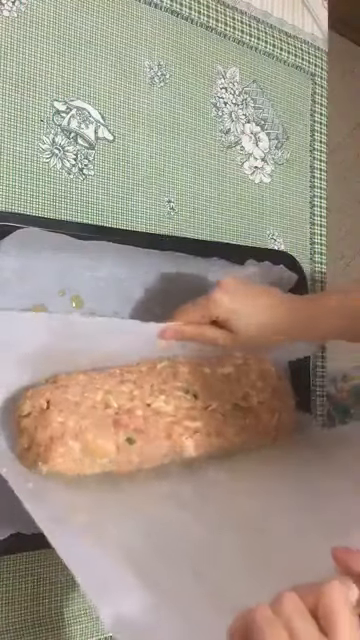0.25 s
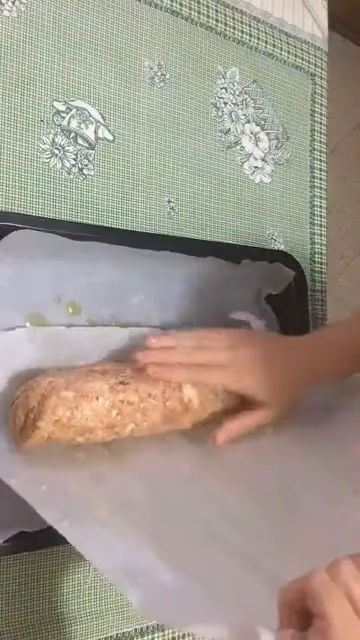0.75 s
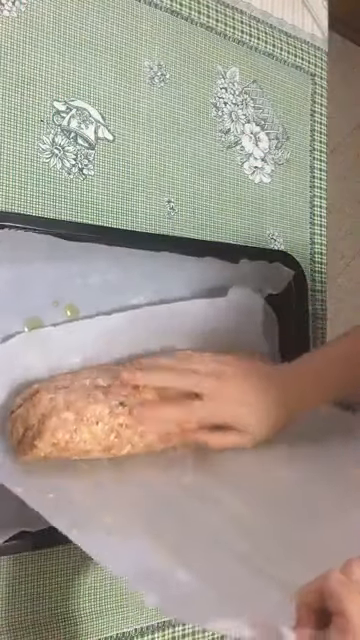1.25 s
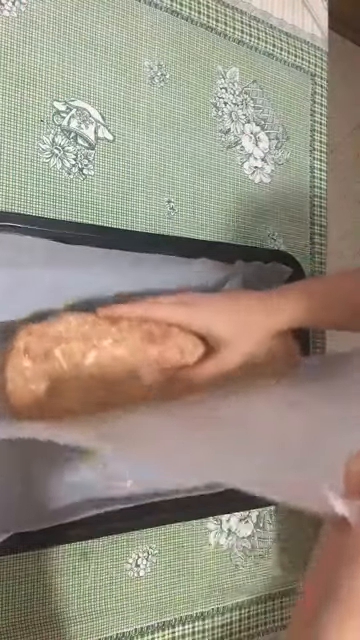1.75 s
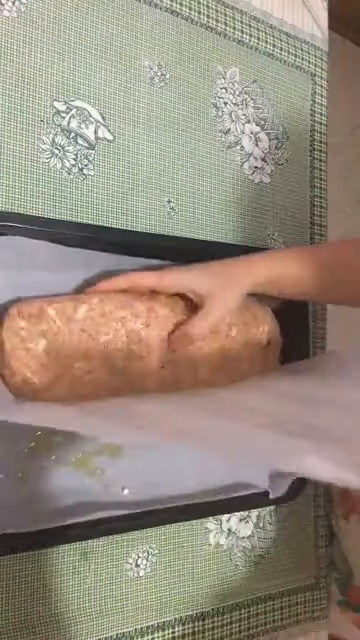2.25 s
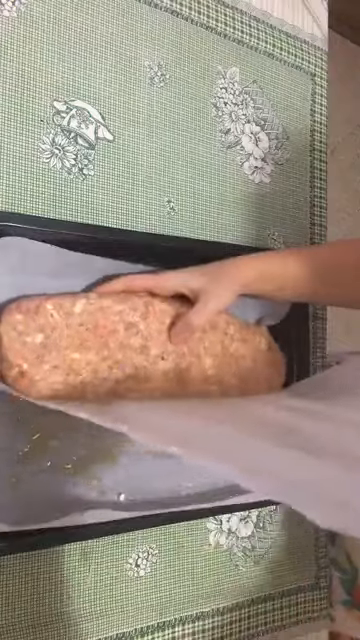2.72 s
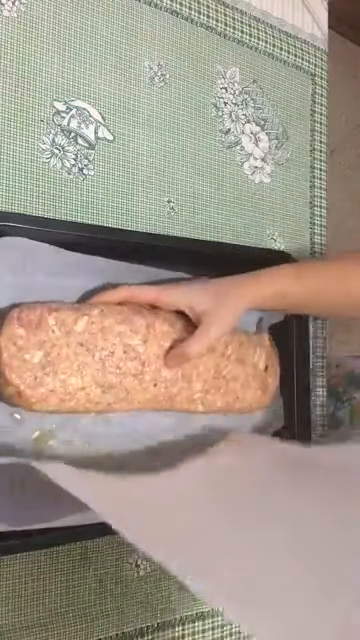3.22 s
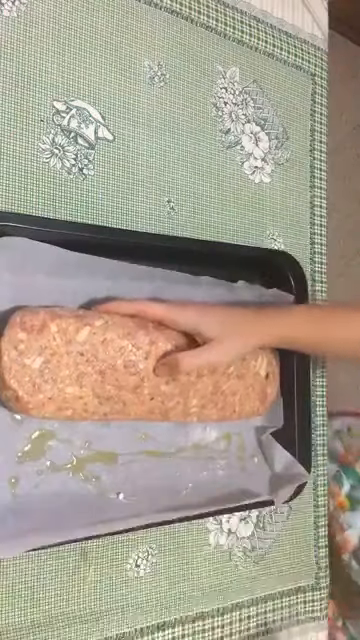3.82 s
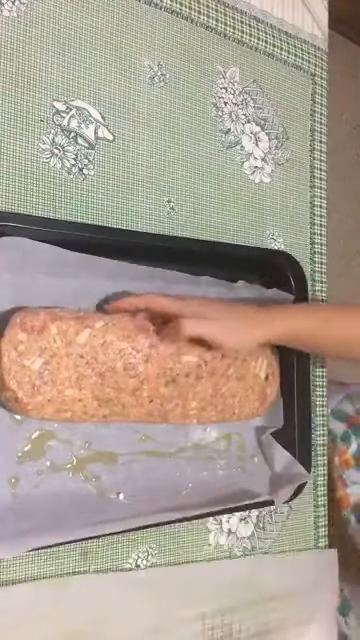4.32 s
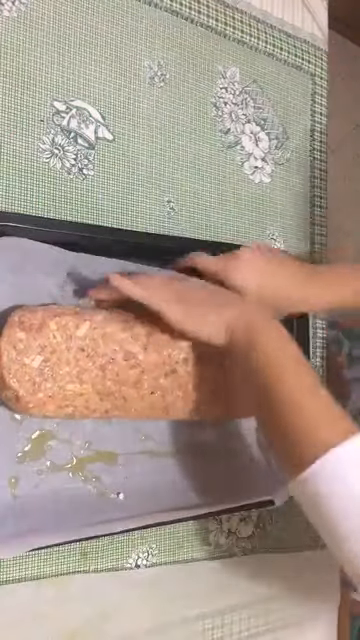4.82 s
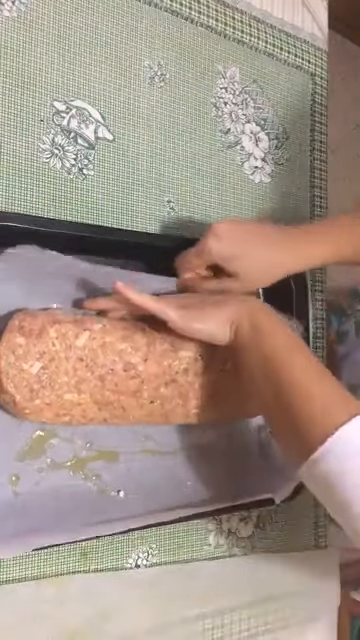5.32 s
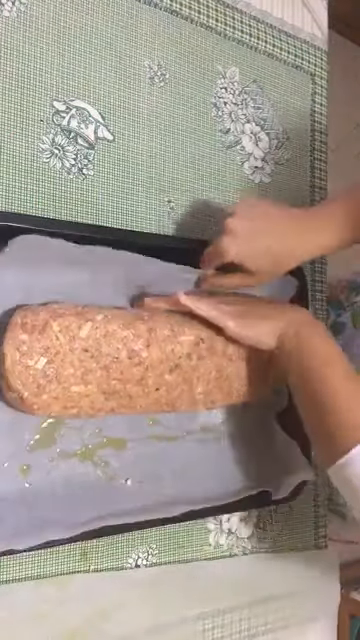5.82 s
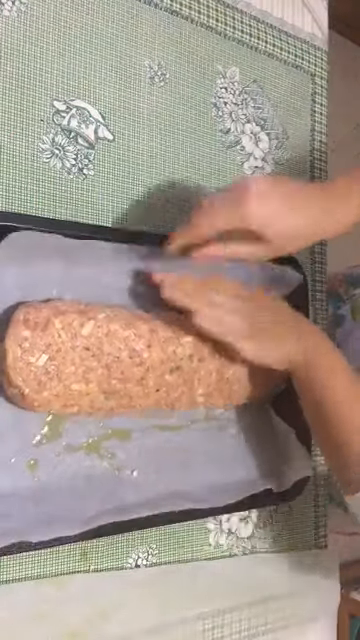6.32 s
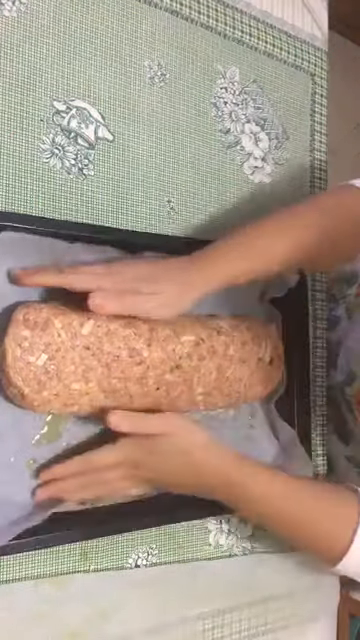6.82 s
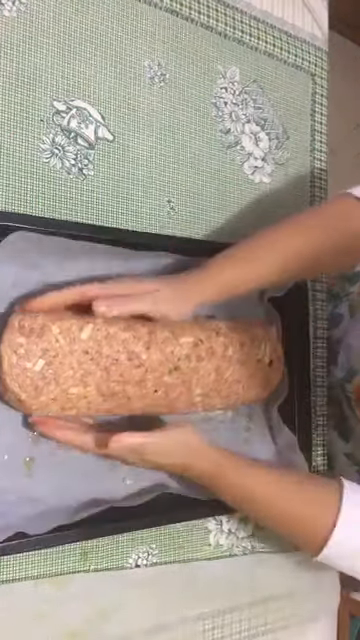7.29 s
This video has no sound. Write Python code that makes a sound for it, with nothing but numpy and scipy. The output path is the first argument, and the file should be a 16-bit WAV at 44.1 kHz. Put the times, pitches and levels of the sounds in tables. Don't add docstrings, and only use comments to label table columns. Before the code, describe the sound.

A sheet of baking parchment slides with a grainy rustle and scattered small snaps as a soft loaf is rolled off it into a metal tray. The sheet comes free with a brief swish, nearly quiet follows, then a hand thumps and the tray lining crackles loudly as it is tucked and patted. Small kitchen, close phone microphone, mono.

```python
import sys
import numpy as np
from scipy import signal
from scipy.fft import rfft, irfft, next_fast_len
from scipy.io import wavfile
from scipy.ndimage import uniform_filter1d

SR = 44100
rng = np.random.default_rng(int(sys.argv[2]) if len(sys.argv) > 2 else 0)


def field_ratio(decibels):
    return 10 ** (np.asarray(decibels, dtype=float) / 20)


def to_wav(s):
    ch = np.atleast_2d(s).T
    pcm = np.round(np.clip(ch, -1, 1) * 32767)
    wavfile.write(sys.argv[1], SR, pcm.astype(np.int16))


N = 332955


def rms_one(x):
    return x / np.sqrt(np.mean(x ** 2) + 1e-20)


def band(x, low_hz, high_hz):
    sos = signal.butter(2, [low_hz, min(high_hz, 0.45 * SR)], "band", fs=SR, output="sos")
    return signal.sosfilt(sos, x)


def drift(rate_hz):
    r = np.exp(-40 * np.pi * rate_hz / SR)
    slow = signal.lfilter([1], [1, -2 * r, r * r], rng.standard_normal(N // 20 + 4002))[4000:]
    return np.interp(np.arange(N) / 20, np.arange(len(slow)), rms_one(slow))


def ring(x, hz, t60_s):
    r, w = field_ratio(-60 / (t60_s * SR)), 2 * np.pi * hz / SR
    return signal.lfilter([0, np.sin(w)], [1, -2 * r * np.cos(w), r * r], x + 1e-18)


# pitch_hz, density_db (per Hz)
PAPER_COLOUR = [(15, -37), (25, -12), (49, -15), (166, -13), (310, -11), (346, -9), (519, -8.5),
                (663, -6.5), (823, -2.5), (1420, 0.5), (3100, 0.5), (8690, -10.5), (10500, -8.5),
                (12400, -17.5), (16200, -15)]


def paper_db(hz):
    colour_hz, colour_db = np.transpose(PAPER_COLOUR)
    return np.interp(np.log(hz), np.log(colour_hz), colour_db)


def zone_db(low_hz, high_hz):
    hz = np.linspace(low_hz, high_hz, 200)
    return 10 * np.log10(np.mean(field_ratio(2 * paper_db(hz))) * (high_hz - low_hz))


def grains(per_s, spread_db, clump):
    sizes = field_ratio(spread_db * np.minimum(rng.exponential(1, N), 5)) * rng.choice([-1, 1], N)
    return rms_one(sizes * (rng.random(N) < per_s * clump / SR))


# peak_s, rustle_db, swell_s, fade_s, brightness_db; swell and fade span 20 dB
PULLS_ON_SHEET = [(0.0, -45, .1, 0.13, -4), (.15, -56.5, 0.65, 1.3, -9), (0.319, -49.5, 0.13, 0.61, -1),
                  (0.431, -45, 0.35, 0.64, -2.5), (.63, -46.5, 0.033, 0.33, 5), (.8, -43.5, 1, 0.77, -5),
                  (0.991, -61, 0.31, .06, -2), (1.06, -55.5, 0.21, .4, -5.5), (1.15, -54, 0.4, 0.42, -9),
                  (1.274, -49.5, 0.15, 0.63, -4.5), (1.37, -48.5, 0.19, 0.62, -1.5),
                  (1.48, -47.5, .4, .5, 0.5), (1.62, -50.5, 0.44, 0.75, -0.5),
                  (1.821, -43.5, 0.14, 0.22, 4), (1.889, -40.5, 0.068, 0.19, 0),
                  (1.973, -42.5, 0.17, 0.59, 0.5), (2.471, -45.5, 1.08, 1.1, -1.5),
                  (2.95, -65, 0.29, 1.6, 13), (3.153, -49, 0.53, 0.5, 1.5), (3.2, -51, .1, 0.28, -1.5),
                  (3.35, -57, 0.39, .5, -0.5), (3.507, -47.5, 0.011, .25, 1), (3.55, -50, 0.11, 0.24, -1.5),
                  (3.65, -54, 0.12, 0.4, -2), (3.71, -50.5, 0.046, .2, 2), (3.747, -31, 0.033, 0.12, -1.5),
                  (3.82, -42, 0.063, 0.61, -3), (4.26, -50.5, 0.39, 0.13, 0), (4.33, -60.5, .2, 0.4, -9),
                  (4.45, -65.5, 0.48, .5, -1), (4.615, -68, .02, .2, 20), (4.638, -59.5, 0.05, 0.13, 23.5),
                  (4.69, -55.5, 0.068, 0.11, 12), (4.77, -68.5, 0.27, 0.23, 21)]
# peak_s, rustle_db, swell_s, fade_s, brightness_db
TUCKS_OF_LINING = [(4.834, -45, 0.013, 0.083, 5), (4.92, -52, 0.49, 0.84, 9), (5.005, -47, .03, .12, 8),
                   (5.082, -39.5, 0.11, .3, 2), (5.14, -42, .15, 0.27, 0), (5.205, -39.5, 0.095, 0.16, 5),
                   (5.254, -30, 0.11, 0.21, -1.5), (5.382, -36.5, 0.16, 0.13, -2),
                   (5.484, -40, 0.27, 0.46, -2), (5.742, -33, 0.18, 0.17, -1),
                   (5.88, -36.5, 0.13, 0.27, 3.5), (5.95, -33, 0.13, 0.055, -3.5),
                   (6.05, -39, 0.75, 0.82, -3.5), (6.163, -39, 0.4, 0.11, -0.5),
                   (6.225, -37.5, 0.054, 0.63, -3.5), (6.293, -38.5, 0.1, 0.26, -7.5),
                   (6.359, -48, 0.11, 0.35, -9), (6.578, -33.5, 0.0046, 0.2, 2),
                   (6.61, -32, 0.024, 0.22, -4), (6.707, -35, 0.032, 0.18, 1.5),
                   (6.85, -43.5, 0.63, 0.67, 0), (6.965, -40.5, 0.34, 0.2, 1), (7.058, -36, 0.013, 0.16, 3),
                   (7.1, -47.5, .1, 0.32, -0.5), (7.203, -45.5, 0.014, 0.38, -1),
                   (7.28, -43.5, 0.15, 0.14, 9), (7.371, -44.5, 0.16, 0.17, 0), (7.55, -50.5, 0.15, .1, -2)]
# loose_db, lining_db, brightness_share (ratio), pace (ratio), stillness_db
STROKE_ANSWERS = [
    (-4, -11, -0.82, 1.3, -71.5),
    (0, -1, 0.085, 1.63, -92),
    (-0.5, -2, 0.6, 1.8, -75.5),
]


def strokes():
    t = np.arange(0, N + 32, 32) / SR
    rows = np.concatenate([PULLS_ON_SHEET, TUCKS_OF_LINING])
    s, db, swell, fade, bright_db = rows.T[:, :, None]
    rising, falling = (s - t) / np.maximum(swell, 0.005), (t - s) / np.maximum(fade, 0.02)
    lost_db = 20 * np.maximum(rising, falling)
    previous, following = np.r_[s[:1], s[:-1]], np.r_[s[1:], s[-1:]]
    lost_db += 20 * np.maximum(0, np.maximum(previous - t, t - following)) / 0.082
    loose = np.arange(len(s))[:, None] < len(PULLS_ON_SHEET)
    levels = []
    for loose_db, lining_db, share, pace, still_db in STROKE_ANSWERS:
        stroke_db = db + np.where(loose, loose_db, lining_db) + share * bright_db - pace * lost_db
        power = field_ratio(2 * still_db) + field_ratio(2 * stroke_db).sum(axis=0)
        levels.append(np.interp(np.arange(N) / SR, t, 10 * np.log10(power)))
    return levels


# time_s, rumble_db
HAND_WEIGHT = [(0.0, -70.5), (1.4, -68.5), (1.9, -74), (3.45, -72.5), (3.85, -64.5), (4.8, -80),
               (4.83, -51), (5.178, -72.5), (5.55, -70), (5.9, -69.5), (6.59, -71.5), (6.884, -73),
               (7.3, -71), (7.55, -76)]
# low_hz, high_hz
HANDLING_ZONES = [
    (30, 120),
    (120, 400),
    (400, 1800),
    (1800, 6000),
    (6000, 15500),
]


def rustle():
    drum_db, rustle_db, hiss_db = strokes()
    weight_s, weight_db = np.transpose(HAND_WEIGHT)
    shake_db = np.interp(np.arange(N) / SR, weight_s, weight_db)
    levels = (shake_db, shake_db + 4, drum_db, rustle_db, hiss_db)
    efforts = np.array([level - zone_db(*limits) for level, limits in zip(levels, HANDLING_ZONES)])
    efforts[:2] += 0.52 * (drum_db - uniform_filter1d(drum_db, size=SR // 2))
    creasing = np.clip((rustle_db + 67.0) / 20, 0.5, 2)
    centres = np.log([np.sqrt(low * high) for low, high in HANDLING_ZONES])
    flutter = drift(25)
    slips = grains(1100, 4.5, field_ratio(5.0 * flutter))
    smooth = rng.standard_normal((2, N))
    edges, out = np.geomspace(32, 16600, 28), 0
    for k, (low, high) in enumerate(zip(edges, edges[1:])):
        hz = np.sqrt(low * high)
        place = np.interp(np.log(hz), centres, np.arange(5))
        place = np.floor(place) + np.clip(2 * (place % 1) - 0.5, 0, 1)
        effort_db = sum(max(1 - abs(place - z), 0) * efforts[z] for z in range(5))
        grit = np.clip(np.log(hz / 300) / 1.95, 0, 1)
        friction = smooth[k % 2] * field_ratio(1.33 * grit * flutter) + 0.81 * grit * creasing * slips
        patch = rms_one(band(friction, low, high))
        level_db = effort_db + paper_db(hz) + 0.4 + 1.56 * drift(12.2)
        out = out + field_ratio(level_db) * np.sqrt(high - low) * patch
    return out


# pitch_hz, level_db, t60_s
TRAY_MODES = [(355.8, -1.5, 0.41), (480, -9.5, 0.53), (634, -1.5, 0.29), (667.6, 1.5, 0.24),
              (748, -3, 0.27), (1115, -15, 0.12), (1250, -5.5, 0.46), (1340, 1, 0.19), (1390, -5, 0.3),
              (1550, -32, 0.3)]


def lined_tray(x):
    metal = sum(field_ratio(db) * ring(x, hz, t60) * (-1) ** k for k, (hz, db, t60) in enumerate(TRAY_MODES))
    return x + field_ratio(-57.0) * metal


def nearness_db(hz, favoured_hz):
    return -7 * np.log2(hz / favoured_hz) ** 2


# thump_db, tray_ring_db, favoured_pitch_hz
LOAF_PATS = [(-43, -39, 630), (-62, -54, 430), (-46.5, -49, 920), (-47.5, -52.5, 210), (-80, -46.5, 1900),
             (-63, -51.5, 340), (-60, -75, 400), (-62, -66, 360), (-59, -73, 400), (-53, -70, 400),
             (-62, -65, 360)]
PAT_MOMENTS = [4.826, 6.297, 6.61, 6.905, 4.259, .208, .005, .89, 5.65, 5.89, 7.21]
# pitch_hz, level_db, t60_s
TABLE_MODES = [(49, -0.5, 0.26), (63.6, -0.5, .15), (89, -10, 0.22), (140, -23, 0.11)]


def pats():
    thump_db, tray_db, favoured_hz = np.transpose(LOAF_PATS)
    at, push = (np.array(PAT_MOMENTS) * SR).astype(int), np.zeros(N)
    push[at] = field_ratio(thump_db)
    soft = np.hanning(500)
    table = sum(field_ratio(db) * ring(push, hz, t60) for hz, db, t60 in TABLE_MODES)
    out = np.convolve(table, soft / soft.sum() * 2)[:N]
    dying = signal.lfilter([1], [1, -field_ratio(-60 / (0.19 * SR))], push)
    out += field_ratio(-13) * dying * rms_one(band(rng.standard_normal(N), 70, 600))
    for hz, db, t60 in TRAY_MODES:
        tap = np.zeros(N)
        tap[at] = field_ratio(tray_db + db + nearness_db(hz, favoured_hz))
        out += ring(tap, hz, t60)
    return out


# time_s, peak_db, patch_pitch_hz, bright_part_db # creases, strong and slight, buckling as
SHEET_CREASES = [(.0911, -26.5, 3850, -1), (.1719, -33.5, 3280, -13), (.208, -25.5, 2820, 5),
                 (.2221, -34, 2860, -14), (.2463, -33, 1420, -10), (.2982, -35, 3000, -1),
                 (.4859, -21.5, 1400, 1), (.5028, -26, 9000, -22), (.61, -31, 8500, -7),
                 (.649, -20.5, 2560, -3), (.882, -24.5, 2750, 2), (.8903, -25, 1910, 1),
                 (.9716, -33, 1680, 2), (1.2761, -25.5, 1460, 11), (1.2823, -26.5, 2360, -9),
                 (1.3306, -27, 2520, 4), (1.5061, -28.5, 2390, -20), (1.5127, -27.5, 8960, -7),
                 (1.6392, -30.5, 8200, -21), (1.8245, -24.5, 5600, 4), (1.8675, -25.5, 3880, -4),
                 (1.8946, -16, 3470, 6), (1.979, -32, 3120, 11), (2.0141, -23.5, 6060, -11),
                 (2.091, -27.5, 4120, 4), (2.5491, -26, 1460, 4), (2.8319, -36.5, 1530, 0),
                 (2.8831, -35, 2082, -9.5),
                 (3.165, -22, 1940, 5), (3.1964, -28, 6430, 0), (3.212, -34, 2540, -11),
                 (3.2454, -22.5, 1910, 5), (3.3285, -30.5, 2040, -1), (3.341, -26, 3870, 3.5),
                 (3.377, -39, 1530, -33), (3.4281, -39, 3530, 1), (3.4405, -42, 4260, 3),
                 (3.527, -31, 1270, 9), (3.7683, -17, 3080, -2), (3.883, -22, 5930, -11),
                 (3.9233, -25, 5900, 0), (4.248, -39, 1550, -20), (4.1436, -39, 1906, -20),
                 (4.3806, -36, 3200, 3), (4.7147, -34.5, 7540, 11), (5.0343, -22, 3160, -1),
                 (5.067, -18, 6300, -2), (5.0827, -11.5, 7540, 23), (5.2024, -23, 2900, 2),
                 (5.22, -14, 5960, -24), (5.232, -14, 3320, 1), (5.2579, -7, 4850, -1.5),
                 (5.3195, -13.5, 7160, -6),
                 (5.4222, -24, 2400, 2), (5.6281, -17.5, 2330, -12), (5.6652, -31, 1490, -9),
                  (5.7098, -16, 2900, -17), (5.728, -12.5, 6270, -3), (5.7463, -16, 1900, 1),
                  (5.8719, -8.5, 8200, 16), (5.9173, -13.5, 6440, -7), (5.948, -6.5, 3000, 1),
                  (6.027, -18.5, 3130, -20), (6.0913, -18, 3340, 4), (6.218, -21.5, 1900, 0),
                  (6.254, -18.5, 7110, -1), (6.355, -22, 5140, 5), (6.434, -35.5, 5570, -24),
                  (6.698, -24, 3200, -7), (6.7404, -21, 4760, 6), (6.8087, -23, 3150, -3),
                  (6.8227, -29, 2850, -14), (6.8519, -24, 4440, -13), (6.8903, -20.5, 3530, 5),
                  (6.962, -24, 2890, 17), (7.0606, -9.5, 5970, 10.5), (7.071, -16.5, 3780, -21),
                  (6.9915, -25, 3700, 5), (7.33, -20.5, 6500, 1),
                 (.0685, -40, 1070, -20), (.115, -41, 705, -30), (.19, -39, 2800, -8),
                  (.2822, -39, 2480, -10), (.3784, -29.5, 3200, -3), (.5585, -34, 3000, 2),
                  (.596, -38.5, 2060, -19.5), (.632, -34, 1120, -3), (.7202, -35, 1030, -12),
                  (.8663, -32, 2660, -5), (.961, -32, 6130, 2.5), (1.0, -41, 7000, 0),
                  (1.1956, -44, 3200, -5), (1.227, -49, 1200, -24), (1.347, -34, 1500, -3),
                  (1.3607, -29, 3430, -5), (1.372, -36, 1700, -1), (1.7992, -33, 4560, 0),
                  (1.955, -30, 1320, -15), (2.369, -30, 1940, -3), (2.9616, -36, 6010, 4),
                  (3.109, -42, 1600, -20), (3.1324, -30.5, 2640, 2), (3.192, -32, 1700, -8),
                  (3.349, -39, 2000, -8), (3.503, -35.5, 1260, -3), (3.539, -32, 2200, -9),
                  (3.65, -41, 3210, -17), (3.7056, -33, 3060, -2), (3.738, -22, 2400, -3),
                  (3.8503, -26, 1820, 0), (4.527, -52, 7000, 5), (4.542, -58, 6550, 5),
                  (4.7577, -41, 8330, 8), (4.7872, -37.5, 7120, 6), (5.0466, -24, 6020, 3),
                  (5.13, -20, 3190, 0), (5.303, -21.5, 3050, -1), (5.357, -31, 1640, -8),
                  (5.4826, -23.5, 2150, 10), (5.734, -19, 2300, 3), (5.768, -20.5, 3950, -5),
                  (5.904, -19, 2140, -2), (5.923, -24, 2500, -2), (6.182, -28, 6000, 5),
                  (6.345, -31, 6000, 1), (6.637, -23.5, 1340, -6), (6.9687, -22, 7880, -1),
                  (7.09, -25.5, 2310, -5), (7.516, -50, 785, -11)]
FLEXED_SHEET = [(0.099, -35, 1600, -30), (0.19, -34.5, 1270, -28), (.2082, -34, 1400, -30),
                (0.6, -32, 1400, -30), (1.2825, -35, 970, -30), (3.5, -38, 3200, -12),
                (5.7315, -18, 1670, -20), (6.3, -28, 1370, -30), (5.9484, -14, 5900, -8),
                (5.8722, -19, 2800, -20), (5.0635, -22.5, 2700, -3), (4.838, -26, 8500, -10),
                (5.2205, -18, 3300, -10), (6.5775, -24, 3000, 0), (1.376, -32, 3500, -3),
                (1.7, -34, 3000, -3)]
BROAD_FOLDS = [(1.05, -33.5, 1280, -29), (1.7633, -27.5, 3000, 4.5), (1.8856, -17, 3500, 9),
               (3.1444, -27, 4220, 22), (3.8238, -26.5, 2520, -13), (4.189, -34, 1940, -20),
               (4.2595, -39, 1420, -21), (4.687, -30, 7800, 3), (4.8266, -19, 1250, -1),
               (5.005, -15, 6400, 24), (5.092, -18, 3060, 3), (5.371, -17, 1850, 0.5),
               (5.6348, -28, 2670, -15), (5.8814, -19, 3020, -24), (6.2298, -29, 1800, -14),
               (6.2973, -22.5, 1400, -7), (6.581, -21, 3240, -7), (6.611, -24.5, 1390, -5),
               (6.7064, -20, 3280, -4), (6.916, -26, 4300, -15), (7.2018, -24.5, 4300, 2.5),
               (7.2323, -24, 6730, -4), (7.367, -29, 3770, -5)]


def creases():
    tick_count, tick_db, spread_db, low_hz, high_hz = 260, 6, 3, 1200, 9000
    when, size, pitch, shine = rng.random((tick_count - len(FLEXED_SHEET), 4)).T
    s = 0.01 + when * (N / SR - 0.02)
    rustle_db = strokes()[1][(s * SR).astype(int)]
    db = rustle_db + tick_db - spread_db * np.log(np.maximum(size, 0.12))
    small = np.transpose([s, db, low_hz * (high_hz / low_hz) ** pitch, 3 - 18 * shine])
    rows = np.concatenate([SHEET_CREASES,
                           small, FLEXED_SHEET, BROAD_FOLDS])
    ms = 0.4 * (3000 / rows[:, 2]) ** 0.11 * field_ratio(3 * rng.standard_normal(len(rows)))
    ms[-len(BROAD_FOLDS):] = 1.94
    return np.column_stack([rows, ms])


def snaps():
    out, lead = np.zeros(N + 4000), 200
    t = (np.arange(2000) - lead) / SR
    for s, db, hz, bright_db, width_ms in creases():
        noise = rng.standard_normal((2, 2000))
        width_s = max(width_ms, 0.1) / 1000
        crack = np.exp(-np.abs(t) / width_s / np.where(t < 0, 1.2, 1.8))
        shape = crack + 0.4 * (t > 0) * field_ratio(-60 * t / 0.024)
        burst = (noise + 6 * (t == 0)) * shape
        patch = rms_one(band(burst[0], hz / 1.29, hz * 1.235))
        broad = 0.63 * rms_one(band(burst[0], 844, 1940)) + rms_one(band(burst[0], 1860, 5500))
        bright = 0.72 * rms_one(band(burst[1], 4950, 7830)) + 0.64 * rms_one(band(burst[1], 7800, 12500))
        snap = 0.93 * patch + 0.43 * broad + field_ratio(bright_db - 0.5) * bright
        i = round(s * SR) - lead
        out[i:i + len(t)] += field_ratio(db - 1.0) * snap / np.abs(snap).max()
    return out[:N]


def rub_swell(middle_s, length_s):
    t = np.arange(N) / SR
    return np.cos(np.pi * np.clip((t - middle_s) / length_s, -0.5, 0.5)) ** 2


# length_s, level_db, favoured_pitch_hz
TRAY_RUBS = [(0.027, -37, 1260), (0.23, -38, 1150), (0.23, -45, 1020), (0.25, -44.5, 1370),
             (0.1, -37.5, 950), (0.28, -51.5, 580), (0.23, -54.5, 830)]
RUB_MOMENTS = [4.259, 4.94, 7.29, 4.22, 6.63, 6.38, 4.36]


def rubs():
    out = 0
    for hz, mode_db, t60 in TRAY_MODES:
        swell = sum(field_ratio(db + nearness_db(hz, favoured_hz)) * rub_swell(s, length)
                    for s, (length, db, favoured_hz) in zip(RUB_MOMENTS, TRAY_RUBS))
        out = out + field_ratio(mode_db - 40) * ring(swell * rng.standard_normal(N), hz, t60)
    return out


def skin():
    noise, out = rng.standard_normal(N), 0
    for s, (length, db, hz) in zip(RUB_MOMENTS, TRAY_RUBS):
        scuff = rms_one(band(noise, hz / 1.63, hz * 1.4))
        out = out + field_ratio(db - 3.5) * rub_swell(s, length) * scuff
    return out


def kitchen(x):
    size = next_fast_len(N + SR)
    hz = np.arange(size // 2 + 1) * SR / size
    t60_s = 0.25 / (1 + hz / 6000)
    response = 0
    for k, lag_s in enumerate(rng.uniform(0.006, 0.026, 12)):
        loop = field_ratio(-60 * lag_s / t60_s) * np.exp(-2j * np.pi * hz * lag_s)
        response = response + loop / (1 - loop) * (-1) ** k
    return irfft(rfft(x, size) * response, size)[:N]


def scene():
    hits = snaps() + pats()
    mono = hits + field_ratio(-24) * kitchen(hits) + lined_tray(rustle()) + rubs() + skin()
    return np.array([mono, mono])


# start_s, end_s, pitch_hz
TREBLE_TONES = [(.1, .47, 14062), (.64, .85, 14812), (1.33, 2.42, 14812), (1.33, 2.78, 15562),
                (3.17, 3.7, 15562), (2.97, 4.35, 14812), (2.97, 3.55, 14062), (2.97, 3.32, 13312),
                (3.73, 4.15, 13312), (4.68, 7.0, 15562), (5.87, 6.9, 14812), (7.05, 7.38, 14812),
                (6.58, 7.0, 14062)]


def whistles(x):
    out, t = x.copy(), np.arange(N) / SR
    for start_s, end_s, hz in TREBLE_TONES:
        on = slice(round(start_s * SR), round(end_s * SR))
        sos = signal.butter(2, [hz - 560, hz + 190], "band", fs=SR, output="sos")
        hiss = signal.sosfiltfilt(sos, x[on])
        level = np.sqrt(uniform_filter1d(hiss ** 2, size=300) + 1e-14)
        out[on] += 0.9 * level * np.sin(2 * np.pi * hz * t[on]) - 0.6 * hiss
    return out


def low_pass(x):
    return signal.sosfilt(signal.butter(12, 16670, fs=SR, output="sos"), x)


def record(dry):
    body_sos = signal.ellip(10, 0.5, 70, 15840, fs=SR, output="sos")
    top_sos = signal.ellip(6, 0.5, 70, [15900, 16500], "band", fs=SR, output="sos")
    body, top = signal.sosfilt(body_sos, dry[0]), signal.sosfilt(top_sos, dry[0])
    sudden = uniform_filter1d(top ** 2, size=200) / (uniform_filter1d(top ** 2, size=4000) + 1e-16)
    body = body + 0.2 * top * np.clip(sudden - 5, 0, 1)
    bass_cut = signal.butter(7, 39, "high", fs=SR, output="sos")
    mono = whistles(signal.sosfilt(bass_cut, body))
    return low_pass(np.array([mono, mono]))


dry = scene()
out = record(dry)
to_wav(out)
```